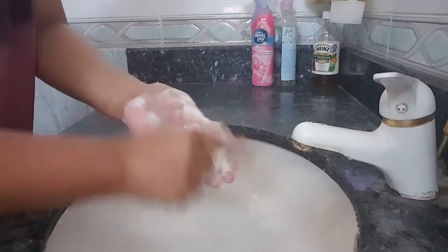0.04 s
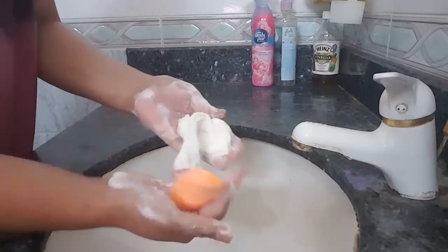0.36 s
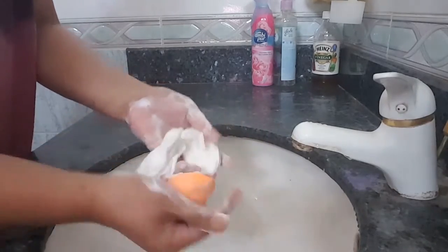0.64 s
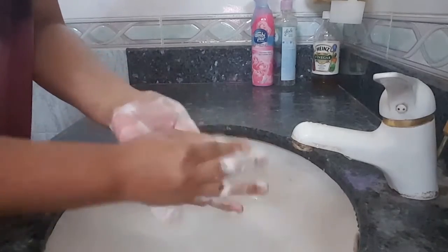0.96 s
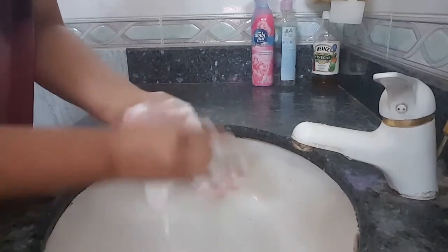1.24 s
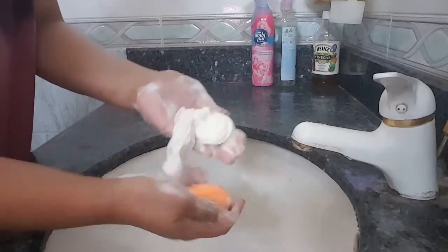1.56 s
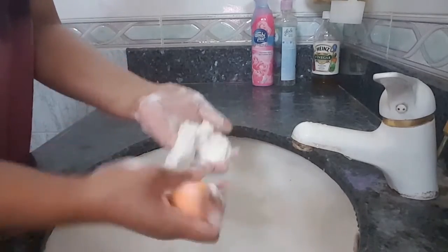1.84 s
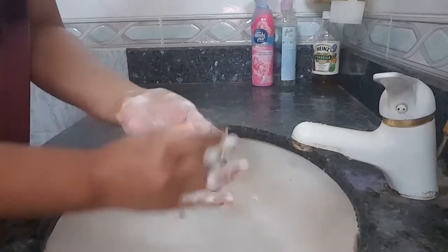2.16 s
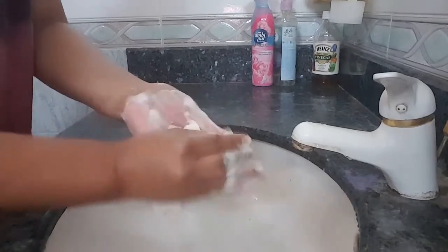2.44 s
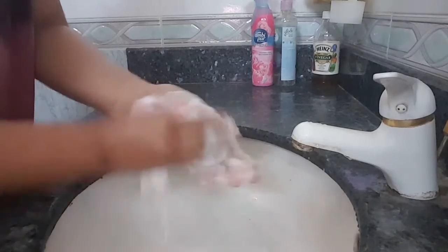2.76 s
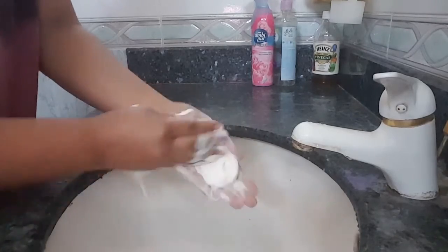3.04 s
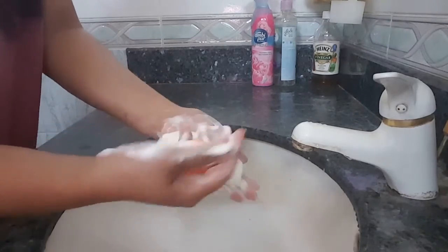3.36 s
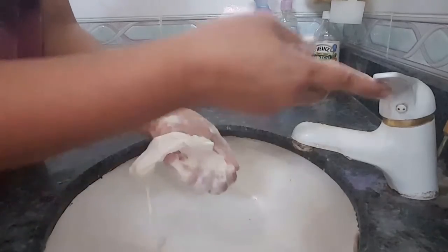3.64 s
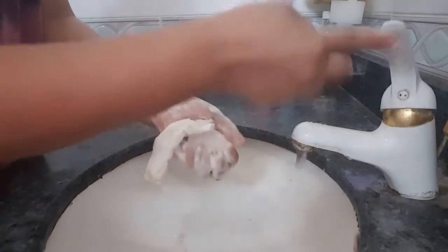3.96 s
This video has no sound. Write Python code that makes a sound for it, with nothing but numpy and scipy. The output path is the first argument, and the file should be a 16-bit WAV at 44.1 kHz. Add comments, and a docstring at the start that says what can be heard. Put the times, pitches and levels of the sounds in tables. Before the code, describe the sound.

Hands rub soap over a wet cloth in bouts of quick squelching strokes, with fizzing lather and soft palm thuds. At the end a tap lever knocks hard. It sounds close, in a small echoing bathroom with a low drone.

```python
"""Soap and wet cloth at a basin.

Hands rub soap over a wet cloth in a small tiled bathroom, in bouts of quick strokes. Each stroke
squelches and bursts tiny bubbles; air trapped in the palms thuds; lather ticks over the room's drone.
At the end a hand bumps the tap and its lever knocks hard through the counter."""
import sys
import numpy as np
from scipy import signal
from scipy.fft import rfft, irfft, next_fast_len
from scipy.io import wavfile
from scipy.ndimage import uniform_filter1d, map_coordinates

SR = 44100
rng = np.random.default_rng(int(sys.argv[2]) if len(sys.argv) > 2 else 0)


def store_wav(level_fs):
    """Save 16-bit WAV to argv[1]."""
    pcm = np.round(np.clip(np.atleast_2d(level_fs), -1, 1) * 32767)
    wavfile.write(sys.argv[1], SR, pcm.T.astype(np.int16))


N = 176400

# Room resonances. Each row: frequency in Hz, half-width in Hz, level in dB.
DRONE_MODES = [(52.3, 5.1, -63.5), (105.4, 7.9, -53), (147.6, 10.6, -57), (187.7, 16.5, -53.5),
               (321, 19, -62.5)]
# Swell of those resonances. Each row: time in seconds, gain in dB.
MODE_SWELL = [(0, 0.5), (.7, 1), (1.0, -2.5), (1.35, 2), (1.6, -5.5), (1.9, 1), (2.23, -4), (2.38, 4),
              (2.7, -1), (3.1, 1), (3.5, 2), (3.8, 1.5)]
# Background wash. Each row: time in seconds, level in dB.
WASH_ENVELOPE = [(0, -54), (.35, -50), (.8, -53.5), (1.6, -57), (2, -62), (3, -51), (3.5, -50.5),
                 (3.78, -61), (4, -80)]
# Rubbing strokes. Each row: peak time, rise and fall in seconds, level in dB, fizz and squelch trims in dB.
RUB_STROKES = [(.009, 0.02, 0.014, -43.5, 5, 6), (0.049, 0.011, 0.0084, -47, 1, 0.5),
               (.095, 0.024, 0.03, -47.5, 2.5, -3), (.148, 0.035, 0.025, -47, 0, -3.5),
               (.345, 0.15, 0.048, -59.5, 4, 1), (.899, 0.019, .013, -48, 6, 2),
               (.945, 0.028, 0.068, -51, -0.5, 0), (1.091, 0.031, 0.018, -46.5, 1, -3.5),
               (1.201, 0.041, 0.036, -45, 0.5, 1.5), (1.324, 0.031, 0.024, -46.5, 1.5, 2),
               (1.452, 0.048, 0.038, -47, 2, -3.5), (2.11, 0.016, 0.023, -46.5, -1.5, -0.5),
               (2.2, 0.038, 0.034, -52.5, 2.5, -1), (2.334, 0.025, 0.027, -47.5, 2, -4),
               (2.422, 0.012, 0.018, -49.5, 2.5, -9), (2.469, 0.021, 0.019, -46, -2.5, -6),
               (2.588, 0.042, 0.031, -48, -0.5, -1), (2.692, 0.033, 0.018, -44.5, -2, -1),
               (2.808, 0.042, 0.027, -45, 2, 4), (2.932, 0.035, 0.035, -45.5, -1, 4),
               (3.048, 0.031, 0.024, -44.5, 3, 4), (3.09, 0.019, 0.011, -47, -1, 12),
               (3.162, 0.038, .024, -51.5, 4.5, -8), (3.214, 0.035, 0.015, -50.5, 0.5, -13),
               (3.64, .03, 0.025, -63, -5, -6)]
# Palm thuds. Each row: start in seconds, level in dB, pitch in Hz.
PALM_THUDS = [(.003, -38, 266), (.685, -37.5, 330), (1.069, -39.5, 276), (1.319, -37.5, 266),
              (1.375, -43.5, 328), (3.035, -37.5, 311)]
# Lather ticks and drips. Each row: start in seconds, level in dB, pitch in Hz, half-width in octaves.
LATHER_TICKS = [(0.409, -39, 1300, .4), (.516, -62, 13000, .3), (.526, -59, 13000, .3),
                (.609, -51, 7200, 0.27), (.749, -52, 10000, .5), (.76, -56, 11000, .5),
                (0.897, -41.5, 2280, 0.28), (.942, -35, 985, 0.38), (1.727, -41.5, 2330, 0.46),
                (1.814, -61, 7040, 0.56), (2.019, -50, 2470, .3), (2.049, -55.5, 6000, 0.66),
                (2.095, -40, 2000, .5), (2.315, -49, 6500, .5), (3.044, -27, 1190, 0.28),
                (3.349, -60, 11500, .55), (3.356, -57, 11500, .55), (3.45, -62, 7060, .5),
                (3.607, -53, 4260, .3), (3.621, -44.5, 2000, 0.34), (3.629, -46, 3070, 0.57)]
# Knocks on the tap. Each row: start in seconds, gain in dB, contact cutoff in Hz.
TAP_KNOCKS = [(3.846, -42, 700), (3.863, -33, 300), (3.9955, -5.5, 2500)]
# Counter resonances. Each row: frequency in Hz, gain in dB, T60 in seconds.
COUNTER_MODES = [(102, -35, .35), (195, -23.5, 0.14), (255, -2, 0.077), (730, -4.5, 0.027),
                 (876, 0.5, 0.04), (1204, 2, 0.025), (1310, -17, 0.021), (2350, -5.5, 0.039)]
# Texture spectra. Each row: frequency in Hz, relative level in dB.
DRONE_SPECTRUM = [(12, -61), (20, -30), (70, -7.5), (98, -7.5), (153, -17), (186, 0), (274, -15.5),
                  (324, -3.5), (428, -15), (506, -14.5), (707, -20.5), (790, -18), (1100, -22.5),
                  (2280, -27), (15600, -49)]
WASH_SPECTRUM = [(200, 9), (400, 4), (900, 0.5), (1400, -8), (2100, -8), (2700, -6.5), (3500, -15.5),
                 (5000, -23), (15000, -39)]
RUB_SPECTRUM = [(250, -3), (500, -14), (900, -9.5), (1200, -5.5), (1520, -4), (1750, -3), (2150, 1.5),
                (2800, -1.5), (4000, -7.5), (6000, -17), (9000, -43), (16000, -45)]
FIZZ_SPECTRUM = [(1500, -21), (3500, -1), (5500, -1), (8000, -3.5), (12000, -6.5), (15500, -11)]
SQUELCH_SPECTRUM = [(120, -14.5), (300, 4.5), (480, -4.5), (650, -12), (800, 3.5), (930, 5.5), (1150, -5.5),
                    (1500, 2.5), (2200, 1), (5000, -48)]
DRAG_SPECTRUM = [(80, -8), (115, 12.5), (150, -15), (190, 3.5), (280, -7.5), (450, -14), (800, -16),
                 (1200, -22), (1800, -40), (4000, -55), (15000, -76)]
# Decay of the tiled room. Each row: frequency in Hz, T60 in seconds.
TILE_DECAY = [(150, 0.73), (1000, 0.71), (3000, 0.68), (7000, 0.66), (15000, 0.33)]
# Stereo likeness. Each row: frequency in Hz, left-right correlation.
ROOM_CORRELATION = [(60, 1), (170, 0.99), (260, 0.88), (360, 0.44), (600, .65), (950, 0.26), (2400, 0.071),
                    (6000, 0)]
HANDS_CORRELATION = [(130, .95), (300, 0.98), (640, 0.81), (900, 0.42), (1150, -0.1), (1500, .1),
                     (2200, 0.23), (3100, 0.32), (6800, 0.025), (15000, -0.075)]
# Stereo balance. Each row: frequency in Hz, left minus right in dB.
LEFT_BIAS = [(40, 0.5), (120, 1.9), (600, 0), (1200, 0.5), (2200, 1.3), (4000, -0.5), (9000, 1.5)]


def amp(db):
    """Decibels to gain."""
    return 10 ** (np.asarray(db) / 20)


def unit(x):
    """Scale to rms 1."""
    return x / np.sqrt(np.mean(x ** 2) + 1e-20)


def along(points, hz):
    """Interpolate on a log frequency axis."""
    freqs_hz, values = np.transpose(points)
    return np.interp(np.log(hz + 1), np.log(freqs_hz + 1), values)


def envelope(rows):
    """(s, dB) points to gain per sample."""
    return amp(np.interp(np.arange(N) / SR, *np.transpose(rows)))


def wobble(rate_hz):
    """Smooth random curve."""
    return map_coordinates(rng.standard_normal(4000), [np.arange(N) * rate_hz / SR], mode="wrap")


def filtered(x, response):
    """Apply a gain given as a function of Hz."""
    size = next_fast_len(N + SR // 2)
    return irfft(rfft(x, size) * response(np.fft.rfftfreq(size, 1 / SR)), size)[..., :N]


def spread(pair, correlation):
    """Two unrelated signals to left and right with the given correlation."""
    def mid_side_gains(hz):
        angle = np.arccos(np.clip(along(correlation, hz), -1, 1)) / 2
        return np.array([np.cos(angle), np.sin(angle)])
    mid, side = filtered(pair, mid_side_gains)
    return np.array([mid + side, mid - side])


def coloured(pair, spectrum, correlation):
    """Stereo texture of rms 1 with the given spectrum."""
    return unit(spread(filtered(pair, lambda hz: amp(along(spectrum, hz))), correlation))


def room_noise(spectrum):
    """Coloured noise, near mono in the bass, wide in the treble."""
    return coloured(rng.standard_normal((2, N)), spectrum, ROOM_CORRELATION)


def drone(steady_db=-52.5):
    """Low background noise gathers in the room's modes, under a soft wash."""
    modes = np.zeros(N)
    for hz, width_hz, db in DRONE_MODES:
        band = filtered(rng.standard_normal(N), lambda f: 1 / (1 + ((f - hz) / width_hz) ** 2))
        modes += amp(db) * unit(band)
    steady = amp(steady_db) * room_noise(DRONE_SPECTRUM)
    wash = envelope(WASH_ENVELOPE) * room_noise(WASH_SPECTRUM)
    return envelope(MODE_SWELL) * modes + steady + wash


def bubbles(per_s, centre_hz, cycles, scatter_db):
    """Bursting bubbles, each a short damped ring of its own size and place."""
    count = int(np.clip(per_s * N / SR, 1, 40000))
    when, pitch, strength, place = rng.random((40000, 4))[:count].T[:, :, None]
    hz = np.minimum(centre_hz * 2 ** (3 * (pitch - .5)), SR / 2)
    age = np.arange(120)
    turns = hz * age / SR
    gain = amp(scatter_db * np.minimum(-np.log(1 - strength), np.pi))
    rings = gain * np.sin(2 * np.pi * turns) * np.exp(-np.pi * turns / cycles) * (1 - age / len(age))
    index = ((when * N).astype(int) + age).ravel()
    pans = np.cos(2 * np.pi * place), np.sin(2 * np.pi * place)
    return unit(np.array([np.bincount(index, (rings * pan).ravel(), N)[:N] for pan in pans]))


def pockets(pair, depth_db=2.0):
    """Air pockets open and close in the wet folds, so narrow bands briefly stand out."""
    bands = signal.stft(pair, nperseg=512)[2]
    field = uniform_filter1d(rng.standard_normal(bands.shape[1:]), size=2, axis=0)
    field = uniform_filter1d(field, size=6, axis=1)
    return signal.istft(bands * amp(depth_db * unit(field)), nperseg=512)[1][:, :N]


def lather(crowd, spectrum, hiss_db):
    """Bubbles on the hiss of sliding wet cloth, coloured by the folds."""
    hiss = amp(hiss_db) * rng.standard_normal((2, N))
    return coloured(pockets(crowd + hiss), spectrum, HANDS_CORRELATION)


def scrubbing(fizz_db=-11, squelch_db=-5.5, judder_db=1.95, judder_hz=130):
    """Each stroke swells and fades, driving the rub, the foam's fizz and the cupped palm's squelch."""
    t = np.arange(N) / SR
    power = np.zeros((3, N))
    for peak_s, rise_s, fall_s, db, fizz_trim_db, squelch_trim_db in RUB_STROKES:
        shape = np.exp(-((t - peak_s) / np.where(t < peak_s, rise_s, fall_s)) ** 2)
        levels_db = [[db], [db + fizz_trim_db + fizz_db], [db + squelch_trim_db + squelch_db]]
        power += shape * amp(levels_db) ** 2
    rub_gain, fizz_gain, squelch_gain = np.sqrt(power) * amp(judder_db * wobble(judder_hz))
    medium = bubbles(per_s=2200, centre_hz=2410, cycles=3.1, scatter_db=0.5)
    rub = lather(medium, RUB_SPECTRUM, hiss_db=0)
    fine = bubbles(per_s=2200, centre_hz=7300, cycles=2.9, scatter_db=-0.5)
    fizz = lather(fine, FIZZ_SPECTRUM, hiss_db=0)
    large = bubbles(per_s=800, centre_hz=860, cycles=11, scatter_db=1.5)
    squelch = lather(large, SQUELCH_SPECTRUM, hiss_db=-1)
    return rub_gain * rub + fizz_gain * fizz + squelch_gain * squelch


def resting_foam(start_db=-70.5, fade_db_per_s=6.0, patchy_db=2.5):
    """Foam between the fingers fizzes faintly in fading patches."""
    db = start_db - fade_db_per_s * np.arange(N) / SR + patchy_db * wobble(rate_hz=22.25)
    fine = bubbles(per_s=500, centre_hz=8400, cycles=5.5, scatter_db=8.5)
    return amp(db) * lather(fine, FIZZ_SPECTRUM, hiss_db=7)


def thuds(rise_s=0.0056, decay_s=0.023):
    """Air trapped between the palms gives a soft low note."""
    out, t = np.zeros(N + SR), np.arange(SR // 4) / SR
    shape = (1 - np.exp(-t / rise_s)) * np.exp(-t / decay_s)
    for start_s, db, hz in PALM_THUDS:
        out[round(start_s * SR):][:len(t)] += amp(db) * np.sin(2 * np.pi * hz * t) * shape
    return out[:N]


def ticks(rise_s=0.00062, decay_s=0.0023):
    """Single larger bubbles and drips break with a short wet spit around their own pitch."""
    out, t = np.zeros((2, N + SR)), np.arange(SR // 10) / SR
    bins_hz = np.fft.rfftfreq(len(t), 1 / SR) + 1
    shape = np.exp(-t / decay_s) * (1 - np.exp(-t / rise_s))
    for start_s, db, hz, width_oct in LATHER_TICKS:
        band = 1 / (1 + (np.log2(bins_hz / hz) / width_oct) ** 2)
        spit = irfft(rfft(rng.standard_normal((2, len(t)))) * band, len(t))
        out[:, round(start_s * SR):][:, :len(t)] += amp(db) * unit(spit) * shape
    return spread(out[:, :N], HANDS_CORRELATION)


def lever_drag(start_s=3.842, rise_s=0.0031, decay_s=0.35, db=-38.5):
    """The hand drags on the lever; the counter rumbles."""
    t = np.maximum(np.arange(N) / SR - start_s, 0)
    shape = (1 - np.exp(-t / rise_s)) * np.exp(-t / decay_s)
    return amp(db) * shape * room_noise(DRAG_SPECTRUM)


def tap_knocks(contact_s=.0005, crack_db=-26.5, crack_s=0.006, crack_hz=1500, left_lead_s=0.00017):
    """Knocks on the tap ring the counter, with a faint crack; soft contacts reach only the low modes."""
    out = np.zeros((2, N + SR))
    t = np.maximum(np.arange(SR // 2) / SR - np.array([[0], [left_lead_s]]), 0)
    attack = 1 - np.exp(-(t / contact_s) ** 2)
    for start_s, db, cutoff_hz in TAP_KNOCKS:
        ring = sum(amp(mode_db - 60 * t / t60_s) * np.sin(2 * np.pi * hz * t) / np.hypot(1, hz / cutoff_hz)
                   for hz, mode_db, t60_s in COUNTER_MODES)
        crack_gain = amp(crack_db) / (1 + (crack_hz / cutoff_hz) ** 2)
        crack = crack_gain * np.exp(-t / crack_s) * rng.standard_normal(t.shape)
        out[:, round(start_s * SR):][:, :SR // 2] += amp(db) * (ring * attack + crack)
    return out[:, :N] * amp([[1], [-1]])  # left 2 dB above right


def tile_echo(x, tails=6):
    """Tiled walls ring on, treble dying first; several random tails cross-fade to keep the echo smooth."""
    wet, blend = np.zeros((2, N)), np.linspace(0, tails - 1, N)
    for k in range(tails):
        hz, t, bands = signal.stft(rng.standard_normal((2, SR)), SR, nperseg=256)
        decay = amp(-60 * t / along(TILE_DECAY, hz)[:, None])
        tail = signal.istft(bands * decay, SR, nperseg=256)[1]
        tail = np.pad(tail / np.linalg.norm(tail[0]), ((0, 0), (SR // 300, 0)))  # 3.3 ms predelay
        crossfade = np.sqrt(np.maximum(1 - abs(blend - k), 0))
        wet += signal.fftconvolve(x * crossfade, tail, axes=1)[:, :N]
    return spread(wet, HANDS_CORRELATION)


def scene(echo_db=-4.5):
    """Hands, their echo, room and tap, leaning slightly left."""
    hands = scrubbing() + resting_foam() + ticks()
    mix = hands + amp(echo_db) * tile_echo(hands) + thuds() + drone() + lever_drag()
    leaning = filtered(mix, lambda hz: amp(np.outer([.5, -.5], along(LEFT_BIAS, hz))))
    return leaning + tap_knocks()


def record(dry, top_hz=15750):
    """Steep low-pass at the microphone's band limit."""
    return signal.sosfilt(signal.ellip(12, .1, 80, top_hz, fs=SR, output="sos"), dry)


dry = scene()
out = record(dry)
store_wav(out)
```